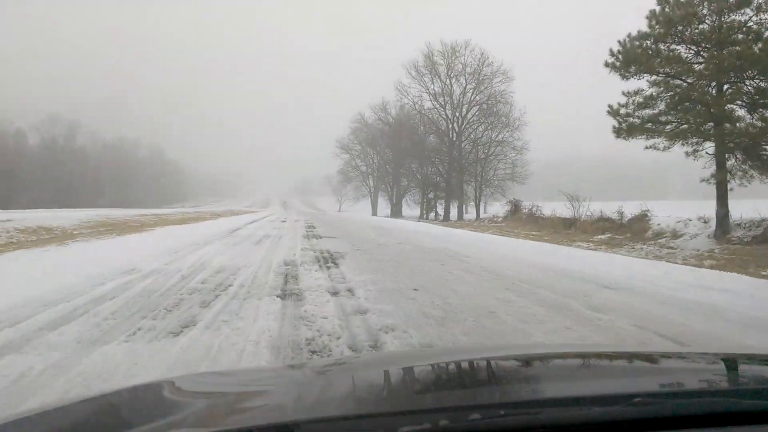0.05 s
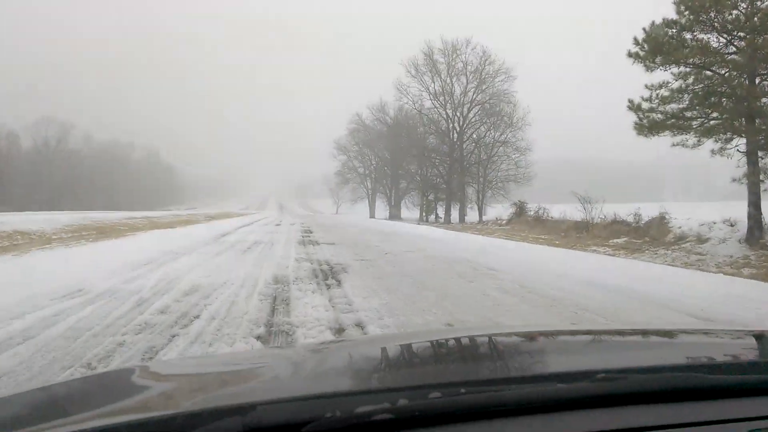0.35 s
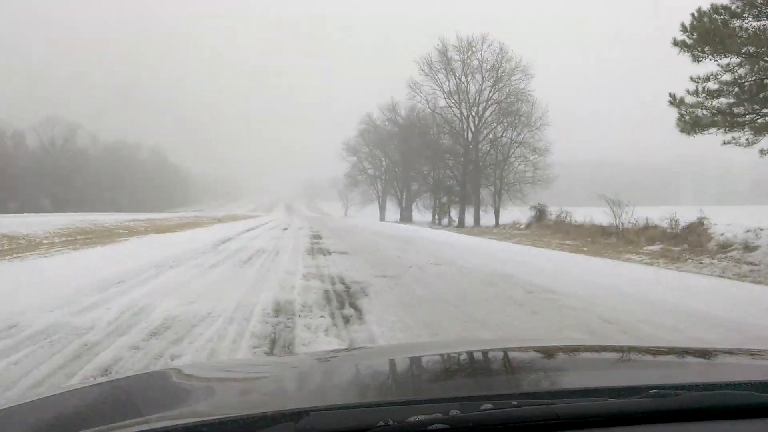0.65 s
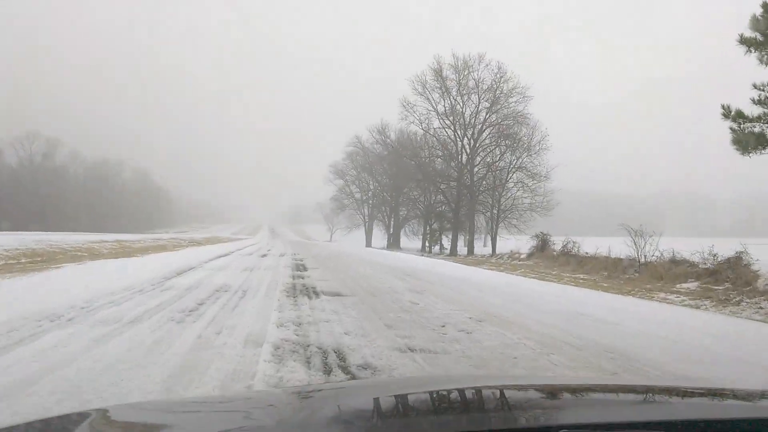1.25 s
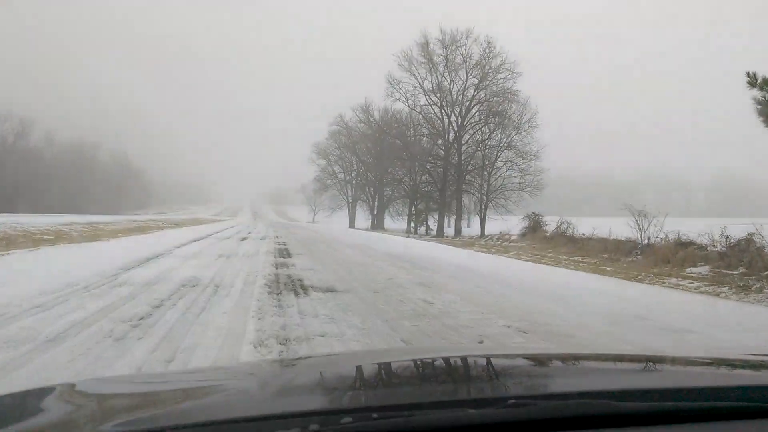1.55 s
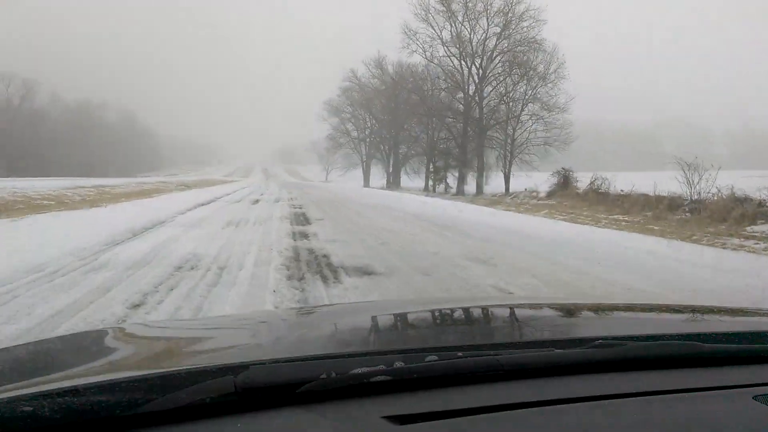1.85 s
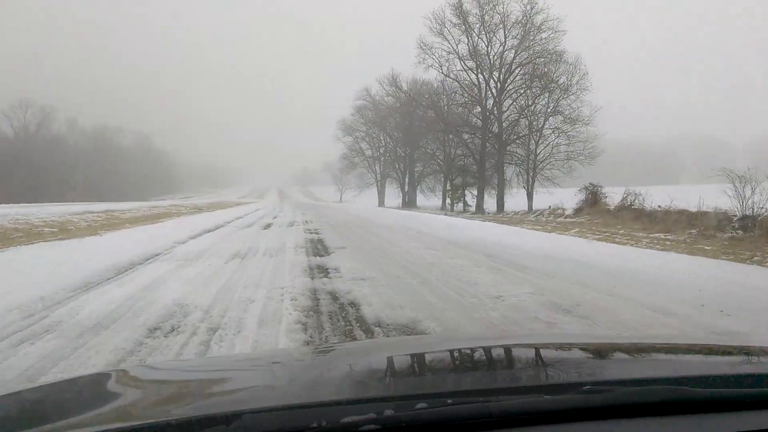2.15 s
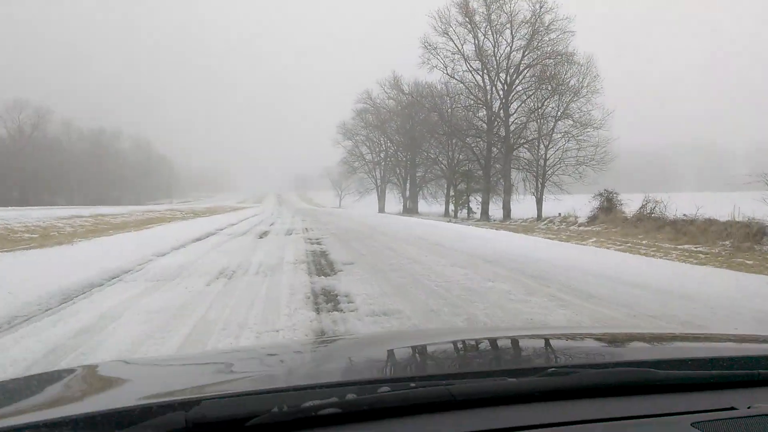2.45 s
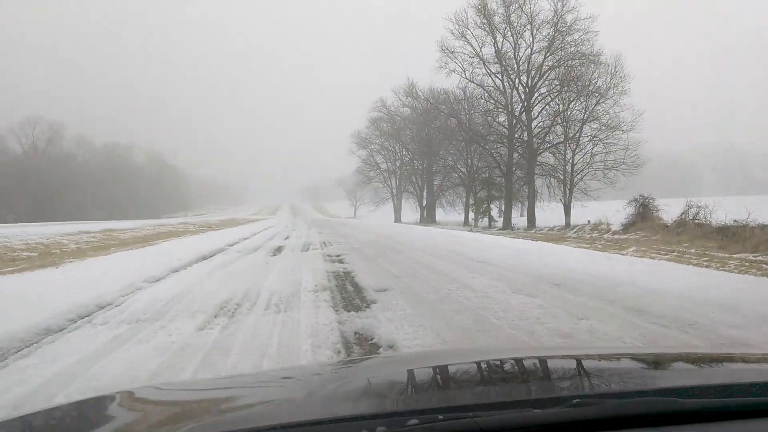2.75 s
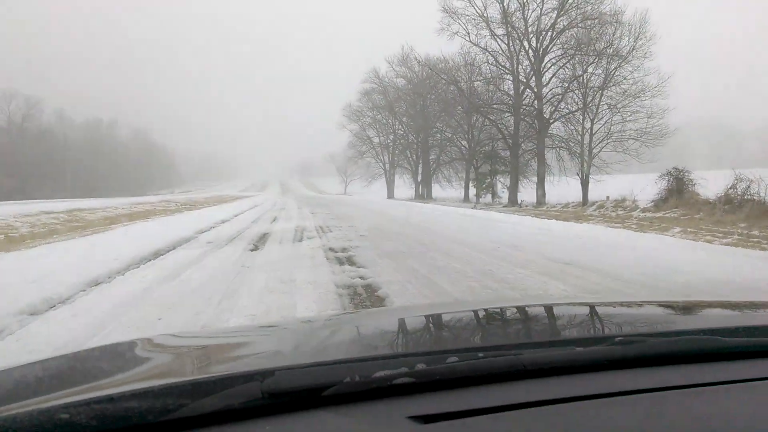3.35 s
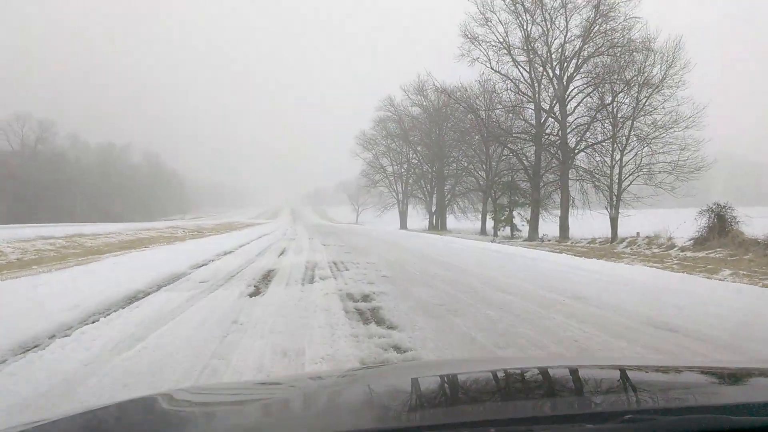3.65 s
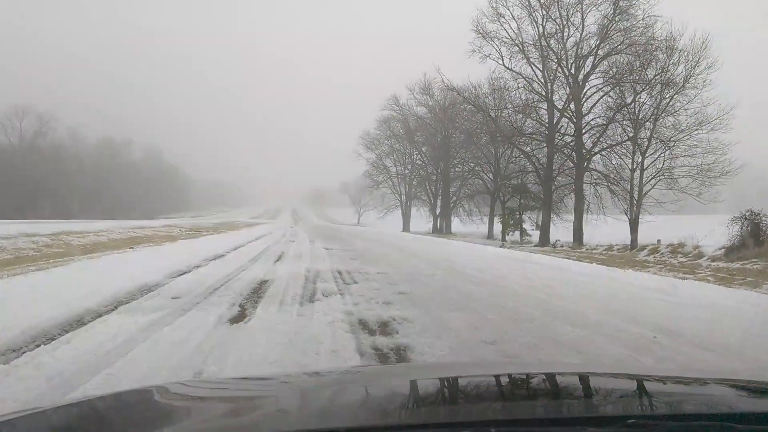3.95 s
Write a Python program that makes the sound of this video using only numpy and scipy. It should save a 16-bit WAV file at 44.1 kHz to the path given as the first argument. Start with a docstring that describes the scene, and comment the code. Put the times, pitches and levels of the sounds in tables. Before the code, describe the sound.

Heard from the cabin, a moving car's low rumble and tyre roar run throughout. Slush sprays the underside in uneven waves, while irregular slaps of clumps, dull crunching bumps over snow ridges and a few ice ticks come through.

```python
"""A deep rumble and the roar of tyres, heard inside a car rolling along a snowy road.
Slush sprays and patters against the underside, thickening and thinning with the cover on the road.
Larger clumps slap a wheel arch, the tyres thump over ridges of packed snow, and bits of ice tick.
Two microphone openings, close together, pick it all up."""
import sys
import numpy as np
from scipy import signal
from scipy.fft import rfft, irfft
from scipy.io import wavfile
from scipy.ndimage import uniform_filter1d

SR = 44100
rng = np.random.default_rng(int(sys.argv[2]) if len(sys.argv) > 2 else 0)


def to_wav(s):
    """Save 16-bit WAV."""
    ch = np.atleast_2d(s).T  # columns
    pcm = np.round(np.clip(ch, -1, 1) * 32767)  # PCM
    wavfile.write(sys.argv[1], SR, pcm.astype(np.int16))


N = 176400
T = np.arange(N) / SR

# How things change along the road. Each row: time in seconds, relative level in dB.
BODY_SHAKE = [(0.0, -15), (0.1, -20), (1.02, -20), (1.1, -20), (1.58, -23.5), (1.78, -20), (2.49, -23),
              (2.53, -21.5), (3.15, -22), (3.33, -19), (3.37, -21), (3.67, -17.5), (3.81, -23),
              (4.0, -23.5)]
ROAD_ROUGHNESS = [(0.0, -32.5), (0.62, -32), (1.58, -35), (1.72, -34), (2.14, -36.5), (2.23, -28.5),
                  (2.29, -37.5), (2.63, -39.5), (2.79, -39.5), (3.01, -30.5), (3.21, -31), (3.25, -32),
                  (3.59, -33.5), (3.65, -30), (3.89, -40), (4.0, -43)]
SLUSH_FLOW = [(0.0, -48.5), (0.26, -51), (0.32, -47.5), (0.72, -50), (0.8, -45), (0.84, -52), (1.06, -49),
              (1.26, -55), (1.34, -49), (1.54, -54), (1.84, -47.5), (2.1, -55.5), (2.2, -47), (2.49, -53.5),
              (2.53, -48), (2.79, -58.5), (2.96, -51.5), (3.0, -47), (3.43, -45), (3.71, -49),
              (3.75, -53.5), (3.95, -61), (4.0, -46)]
FINE_SPRAY = [(0.0, -59.5), (0.3, -57.5), (0.5, -53), (0.7, -54), (0.8, -52), (1.26, -61.5), (1.36, -56),
              (1.66, -65.5), (1.86, -49), (1.94, -58), (2.06, -53), (2.14, -69), (2.2, -51), (2.49, -56.5),
              (2.53, -54), (2.83, -61.5), (2.97, -59.5), (3.01, -48.5), (3.25, -48.5), (3.33, -55),
              (3.47, -47.5), (3.75, -64), (3.95, -67), (4.0, -62)]
# Clumps hitting a wheel arch. Each row: start in seconds, then knock, slap, snap, splash in relative dB.
CLUMP_HITS = [(0.019, -38, -44, -43, -48), (0.306, -47, -48, -44, -57), (0.389, -44, -40, -46, -61),
              (0.42, -39, -47, -59, -60), (0.719, -42, -47, -46, -55), (0.774, -38, -41, -42, -51),
              (0.885, -44, -45, -49, -58), (0.912, -45, -46, -51, -62), (1.098, -42, -48, -46, -55),
              (1.157, -45, -48, -52, -66), (1.2, -39.5, -47, -51, -66), (1.2575, -42, -46, -39.5, -53),
              (1.307, -52, -46, -45, -55), (1.345, -41, -44, -54, -57), (1.369, -39, -45, -40, -62),
              (1.393, -41, -53, -60, -62), (1.477, -39, -48, -56, -65), (1.572, -41, -38, -40, -51),
              (1.645, -39, -43, -54, -68), (1.676, -37, -34.5, -40.5, -48), (1.772, -46, -47, -45.5, -63),
              (1.832, -43, -44.5, -46.5, -51), (1.913, -41, -42, -46, -58), (2.0225, -33, -37, -45, -53),
              (2.06, -39.5, -50, -59, -59), (2.14, -43, -44, -48, -51), (2.1855, -34, -34, -39, -49),
              (2.3595, -39, -39, -43, -54), (2.512, -37, -39, -37, -48), (2.552, -38, -40, -47, -54),
              (2.601, -41, -51, -61, -63), (2.647, -55, -50, -46, -58), (2.8635, -34, -38, -37.5, -49),
              (2.905, -42, -52, -61, -66), (2.98, -38, -43, -48, -53), (3.032, -36, -45, -47, -50),
              (3.277, -37, -47, -56, -57), (3.412, -41, -45, -57, -50), (3.458, -38, -41, -45, -43),
              (3.615, -40, -47, -52, -61), (3.789, -39, -50, -62, -69), (3.838, -41, -47, -53, -64),
              (3.973, -42, -45, -49, -50)]
# Ridges of packed snow. Each row: start in seconds, then thud and crunch in relative dB.
RIDGE_HITS = [(0.11, -24.5, -51), (0.208, -25, -37), (0.248, -27, -56), (0.314, -23.5, -36),
              (0.389, -21, -37), (0.508, -21.5, -36), (0.578, -28, -44), (0.633, -25, -42),
              (0.71, -20.5, -49), (0.754, -20.5, -31), (0.774, -23, -27), (0.793, -30, -43),
              (0.893, -26, -41), (1.043, -25, -42), (1.129, -21.5, -32), (1.873, -22.5, -30),
              (2.059, -22, -47), (2.201, -24.5, -35), (2.239, -26.5, -34.5), (2.257, -27, -46),
              (2.538, -19, -38), (2.556, -20.5, -32), (2.907, -25, -58), (3.06, -23.5, -38),
              (3.071, -16.5, -36), (3.215, -23.5, -38), (3.258, -23.5, -34), (3.274, -19, -28),
              (3.292, -20.5, -38), (3.316, -25, -34), (3.355, -18.5, -50), (3.426, -20, -39),
              (3.655, -31, -47)]
# Bits of ice. Each row: start in seconds, relative level in dB.
ICE_HITS = [(.452, -45), (1.003, -34), (1.0065, -41), (3.122, -41), (3.24, -40), (3.464, -37), (3.469, -39),
            (3.488, -43)]

# The tone of each sound, from low to high. Each row: frequency in Hz, relative level in dB.
RUMBLE_TONE = [(5, -57), (15, -2.5), (32, 1.5), (48, -0.5), (60, -2), (73, -3.5), (88, -7.5), (115, -11),
               (160, -16), (250, -27.5), (500, -47.5), (1200, -83.5)]
ROAR_TONE = [(60, -36.5), (150, 0.5), (230, -1), (330, -2.5), (500, -8), (900, -19.5), (1400, -35.5),
             (2500, -63), (6000, -44)]
HISS_TONE = [(300, -15), (900, 0), (1600, -1), (2400, -.5), (3100, .5), (3800, 1), (4400, -2), (4900, -1.5),
             (5400, 1), (7000, -2), (8500, -11), (11000, -22), (16000, -30)]
FIZZ_TONE = [(2000, -25), (6000, -9), (8200, -5), (10300, -7), (12200, -3), (14000, -3.5), (14700, -1.5),
             (15100, 2.5), (15600, -4)]
KNOCK_TONE = [(100, -11.5), (300, 1.5), (550, -1.5), (700, 1), (880, 1), (1040, -3), (1220, -3.5),
              (1450, -10), (2000, -13), (3000, -33.5), (8000, -49)]
SLAP_TONE = [(500, -6), (1400, -1), (2200, -4.5), (3000, 6.5), (3800, 4.5), (4500, 3), (5600, 7),
             (8200, -42), (16000, -26)]
SNAP_TONE = [(2000, 6), (4400, -1.5), (5400, 7.5), (6200, 8.5), (7000, 6.5), (7700, 8), (8800, -14),
             (12000, -25), (16000, -44)]
THUMP_TONE = [(30, -37), (70, -4.5), (125, 7), (160, 1.5), (185, -5.5), (212, 1), (260, -11.5), (340, -13),
              (600, -26), (1500, -57.5), (4000, -69)]
CRUNCH_TONE = [(100, -24), (250, -6), (400, -1), (650, -3), (900, -13), (1500, -29), (4000, -57)]
TICK_TONE = [(2000, -41), (6000, -1), (8000, -0.5), (11500, -6), (14000, -4), (15200, 4), (16000, -6)]

# How alike the two openings are in the bass. Each row: frequency in Hz, likeness from 0 to 1.
BASS_LIKENESS = [(30, .65), (150, .8), (330, .52), (700, .78), (1000, .75), (1270, .98), (1400, .85),
                 (1570, .25)]
# How far the left opening is ahead in the bass. Each row: frequency in Hz, phase in radians.
LEFT_LEAD = [(30, 1), (120, 0.76), (165, 0.94), (230, 0.76), (380, 1), (500, 0.6), (1400, 0.29)]
# The left opening against the right, before any mixing. Each row: frequency in Hz, level in dB.
LEFT_BASS_DB = [(20, -13), (50, -11), (80, -4.5), (120, -8), (165, -2), (210, -4), (290, -1), (420, -3),
                (800, -1), (1570, -.5)]
LEFT_TREBLE_DB = [(1570, -3), (2000, -5.5), (3200, -6), (5500, -8), (7000, -7.5), (9000, -4.5), (12000, -5),
                  (15000, -6.5)]
# How much of each side is taken off the other. Each row: frequency in Hz, share from 0 to 1.
CROSS_SHARE = [(1570, .85), (2350, .95), (2750, .95), (3200, .7), (3800, .58), (5100, .52), (6400, .47),
               (7700, .53), (9000, .6), (10300, .74), (15000, .84)]


def amp(db):
    """Turns decibels into a number to multiply by."""
    return 10 ** (np.asarray(db) / 20)


def evened(x):
    """Scales a signal so its average strength (rms) is 1."""
    return x / np.sqrt(np.mean(x ** 2) + 1e-20)


def read(points, hz):
    """Reads a table between its rows, on a log-frequency scale."""
    f, value = np.transpose(points)
    return np.interp(np.log(hz + 1), np.log(f + 1), value)


def curve(points):
    """Reads a time table at every sample."""
    return np.interp(T, *np.transpose(points))


def wander(rate_hz):
    """A random drift of strength 1, mostly slower than rate_hz."""
    hz = np.fft.rfftfreq(N, 1 / SR)
    slow = rfft(rng.standard_normal(N)) * (hz > 1) / (1 + (hz / rate_hz) ** 2)
    return evened(irfft(slow, N))


def colour(x, tone, size=8192):
    """Gives a sound a tone, with a filter that rings only after each hit."""
    hz = abs(np.fft.fftfreq(size, 1 / SR))
    log_gain = np.log(amp(read(tone, hz)))
    response = np.exp(np.conj(signal.hilbert(log_gain)))
    taps = np.fft.ifft(response).real[:size // 2]
    return irfft(rfft(x) * rfft(taps / np.linalg.norm(taps), N), N)


def noise():
    """Two unrelated white noises."""
    return rng.standard_normal((2, N))


def bursts(times, levels_db, rise_s, t60):
    """Puffs of noise that swell quickly, then fade by 60 dB in t60 seconds."""
    power = np.zeros(N)
    for s, db in zip(times, levels_db):
        start = max(round(s * SR), 0)
        t = T[:min(N - start, SR // 2)]
        puff = np.minimum(t / rise_s, 1) * amp(db - 60 * t / t60)
        power[start:start + len(t)] += puff ** 2
    return noise() * np.sqrt(power)


def pelting(per_s, spread_db, t60):
    """The rise and fall in loudness of many random hits of uneven size."""
    sizes = amp(spread_db * np.minimum(rng.exponential(1, N), np.e))
    hits = sizes * (rng.random(N) < per_s / SR)
    fade = np.exp(-2 * np.log(1000) / (t60 * SR))
    return evened(np.sqrt(signal.lfilter([1], [1, -fade], hits ** 2)))


def body_rumble(gain_db=4.5, steadiness=0.65):
    """The car body booms on its springs, with its swells partly evened out."""
    boom = evened(colour(noise(), RUMBLE_TONE))
    power = uniform_filter1d(boom ** 2, size=2400, mode="wrap")
    power = uniform_filter1d(power, size=2400, mode="wrap") + 1e-6
    return amp(curve(BODY_SHAKE) + gain_db) * evened(boom / power ** (steadiness / 2))


def tyre_roar(gain_db=-0.5, lumpy_db=1.5):
    """The tread roars on packed snow, louder where the road is rough."""
    return colour(noise() * amp(curve(ROAD_ROUGHNESS) + gain_db + lumpy_db * wander(38)), ROAR_TONE)


def slush_spray(grit_db=-1.5, knock_db=-0.5, slap_db=-5.5, fizz_db=4.5):
    """Slush hits the underside: a hiss of drops, separate grains, soft pats and a fine fizz."""
    flow_db = curve(SLUSH_FLOW)
    hiss = amp(flow_db + wander(8.5)) * noise()
    grit = amp(flow_db + grit_db) * noise() * pelting(per_s=200, spread_db=5.5, t60=0.022)
    pats = amp(flow_db) * pelting(per_s=210, spread_db=3, t60=0.054)
    fizz_level = amp(curve(FINE_SPRAY) + fizz_db + 1.9 * wander(18))
    fizz = fizz_level * pelting(per_s=5300, spread_db=1, t60=0.025) * noise()
    knocks = colour(amp(knock_db) * pats * noise(), KNOCK_TONE)
    slaps = colour(amp(slap_db) * pats * noise(), SLAP_TONE)
    return colour(hiss + grit, HISS_TONE) + colour(fizz, FIZZ_TONE) + knocks + slaps


def slush_clumps(knock_db=4.5, slap_db=6.5, snap_db=8, splash_db=5.5):
    """Each clump knocks the arch, slaps and snaps as it breaks, and throws off a splash."""
    times, knock, slap, snap, splash = np.transpose(CLUMP_HITS)
    return (colour(bursts(times, knock + knock_db, rise_s=0.00096, t60=0.079), KNOCK_TONE)
            + colour(bursts(times, slap + slap_db, rise_s=0.0012, t60=0.036), SLAP_TONE)
            + colour(bursts(times, snap + snap_db, rise_s=0.0007, t60=0.036), SNAP_TONE)
            + colour(bursts(times, splash + splash_db, rise_s=0.00075, t60=0.092), FIZZ_TONE))


def snow_ridges(thud_db=-0.5, shudder_db=-7, crunch_db=0.5):
    """A tyre strikes a ridge: one thud, a brief shudder of the body and a crunch as snow gives way."""
    times, thud, crunch = np.transpose(RIDGE_HITS)
    pushes = np.zeros(N)
    # Each push packs the energy of 15 milliseconds into one sample.
    pushes[np.round(times * SR).astype(int)] = amp(thud + thud_db) * np.sqrt(0.015 * SR)
    shudder = bursts(times, thud + shudder_db, rise_s=0.015, t60=0.16)
    crumbling = bursts(times, crunch + crunch_db, rise_s=0.0049, t60=0.1)
    return colour(pushes + shudder, THUMP_TONE) + colour(crumbling, CRUNCH_TONE)


def ice_ticks(gain_db=2.5):
    """Small, hard bits of ice click brightly."""
    times, level_db = np.transpose(ICE_HITS)
    return colour(bursts(times, level_db + gain_db, rise_s=0.0003, t60=0.02), TICK_TONE)


def microphones(sound, treble_from_hz=1570, lag_s=0.000392):
    """Two close openings pick up the sound, the right one more loudly."""
    hz = np.fft.rfftfreq(N, 1 / SR)
    right, other = rfft(sound)
    # Bass: the left side is partly like the right, but quieter and a little ahead.
    alike = np.clip(read(BASS_LIKENESS, hz), 0, 1)
    left = alike * right + np.sqrt(1 - alike ** 2) * other
    left *= amp(read(LEFT_BASS_DB, hz)) * np.exp(1j * read(LEFT_LEAD, hz))
    # Treble: each side has a late copy of the other taken off, which sounds hollow.
    left_gain, share = amp(read(LEFT_TREBLE_DB, hz)), read(CROSS_SHARE, hz)
    pair = np.array([left_gain * other, right])
    late_copy = np.exp(-2j * np.pi * hz * lag_s) * pair[::-1]
    treble = (pair - share * late_copy) / np.hypot(1, share * left_gain)
    return irfft(np.where(hz < treble_from_hz, np.array([left, right]), treble), N)


def scene():
    """All the sounds together, as heard inside the car."""
    rolling = body_rumble() + tyre_roar() + snow_ridges()
    return microphones(rolling + slush_spray() + slush_clumps() + ice_ticks())


def record(dry):
    """Cuts away the very highest treble, above 15550 Hz."""
    low_pass = signal.firwin(511, 15550, window=("kaiser", 9), fs=SR)
    return signal.oaconvolve(dry, low_pass[None], "same")


dry = scene()
out = record(dry)
to_wav(out)
```